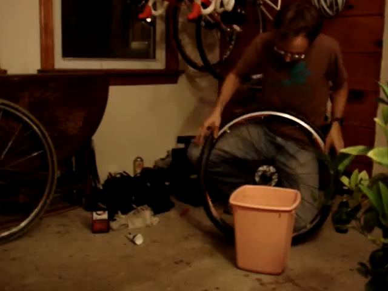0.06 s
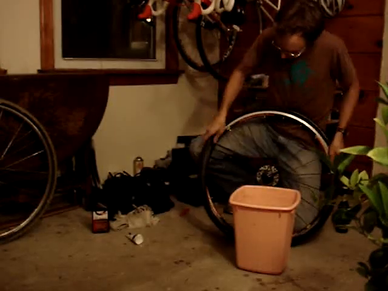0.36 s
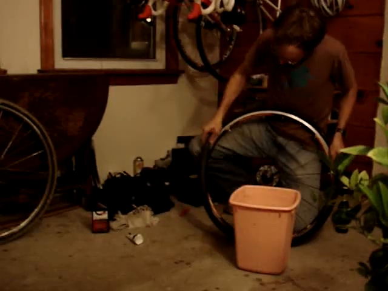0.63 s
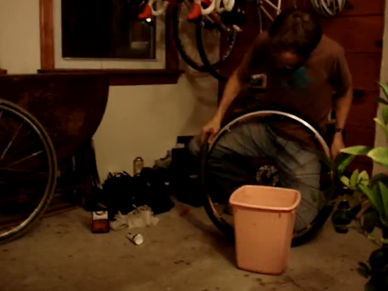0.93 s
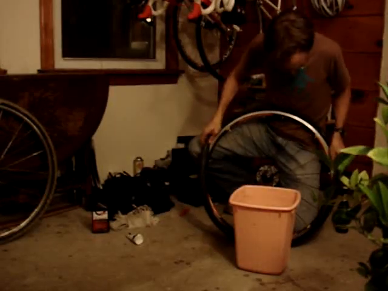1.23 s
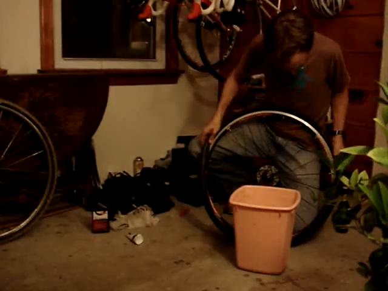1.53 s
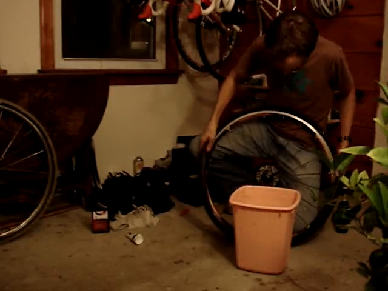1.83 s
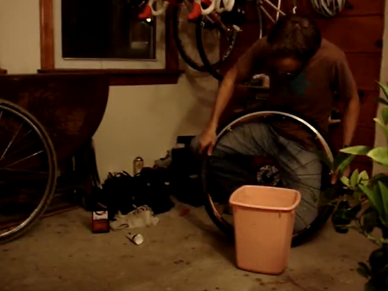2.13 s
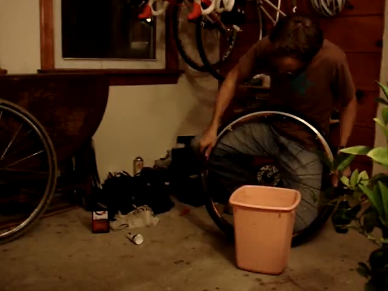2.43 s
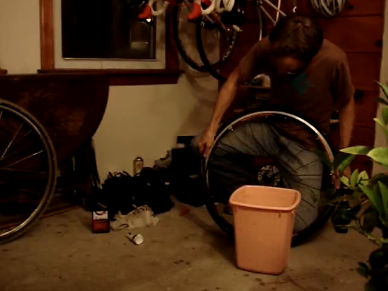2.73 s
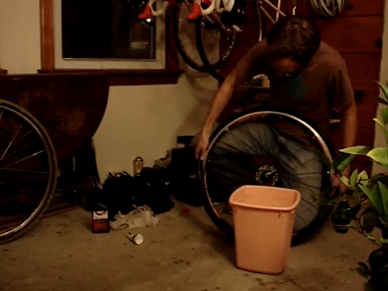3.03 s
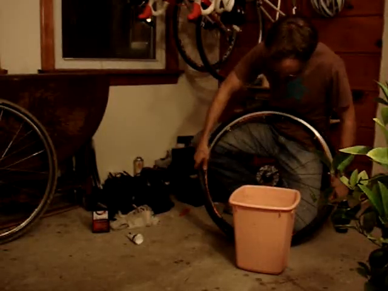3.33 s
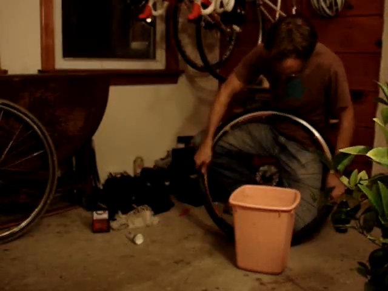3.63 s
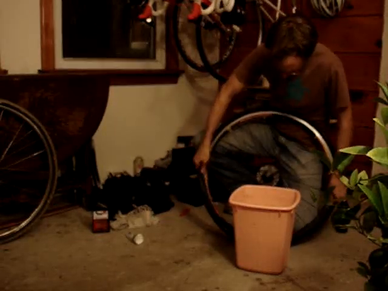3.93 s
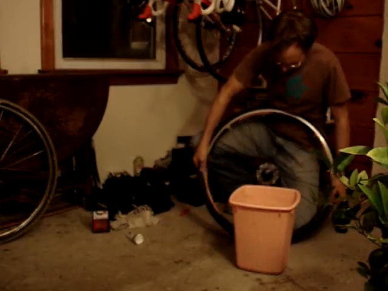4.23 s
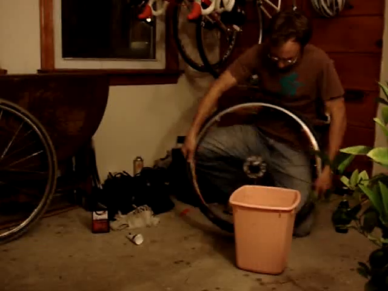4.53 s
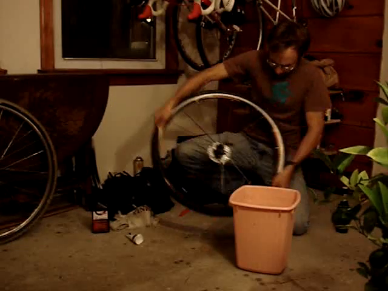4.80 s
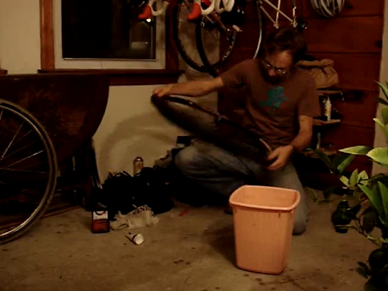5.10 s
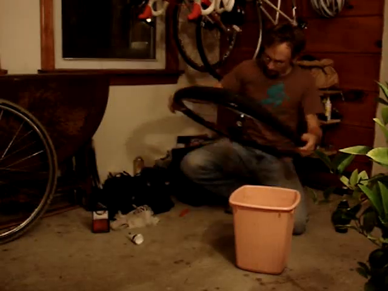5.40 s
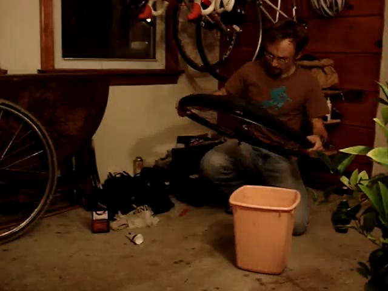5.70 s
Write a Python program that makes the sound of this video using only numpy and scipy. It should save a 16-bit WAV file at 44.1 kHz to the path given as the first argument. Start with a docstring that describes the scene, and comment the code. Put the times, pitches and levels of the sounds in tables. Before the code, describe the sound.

Three sharp snaps of a bike tire slipping over its rim set the spokes ringing, amid faint hand rubs, light knocks and hiss.

```python
"""Three loud, ringing snaps: a bicycle tyre is worked by hand over its rim in a small, hard-walled room.
Each time, the tyre's stiff edge (the bead) slips over the metal rim and sets the spokes ringing.
After the first snap it scrapes along the metal. Palms rub the tread; at the end the wheel is lifted
and the rim ticks. A tiny motor chirrs faintly close by, over a steady hiss and a thin whine."""
import sys
import numpy as np
from scipy import signal
from scipy.fft import rfft, irfft
from scipy.io import wavfile
from scipy.ndimage import uniform_filter1d

SR = 44100
rng = np.random.default_rng(int(sys.argv[2]) if len(sys.argv) > 2 else 0)


def wav_out(sig):
    """Save sig, one row per channel (or a flat mono array), as 16-bit PCM at SR to the path in sys.argv[1]."""
    wavfile.write(sys.argv[1], SR, np.round(np.clip(np.atleast_2d(sig).T, -1, 1) * 32767).astype(np.int16))


N = 262747
TIME = np.arange(N) / SR


def bead_snaps(casing_db=6.5, casing_octaves=0.079, spokes_db=-6, rebound_s=0.0085):
    """The bead jumps the rim in quick slips; the tyre's wall (the casing) and the spokes ring."""
    # slips of the bead: t/s, level/dB, treble tilt/(dB per octave), casing ring f/Hz
    slips = [(1.5034, -6, 0, 880), (1.5344, -12, -2.5, 1850), (1.5585, -18, -5.5, 633),
             (2.6664, -10, 1, 2200), (2.6687, -9.5, -5, 1066), (3.948, -29, -3, 558), (3.967, -16, 3, 2480),
             (3.9745, -13.5, -5, 625), (3.9837, -22, -2, 878), (4.069, -19, 1, 463), (4.109, -26, -1, 760),
             (4.157, -33.5, 11, 910), (4.205, -36, 9, 840)]
    # tone of each stretch of the bead: t/s when it is worked, list of (f/Hz, level/dB)
    stretches = [(1.5, [(40, -27), (150, -28), (300, -9), (570, 0.5), (770, -3), (900, -1), (1030, -6.5),
                 (1190, -0.5), (1850, -6.5), (2250, -10.5), (3100, -17.5), (6200, -35.5), (7200, -35),
                 (10000, -47)]), (2.67, [(50, -42), (110, -32), (300, -18.5), (460, -14), (600, -9),
                 (780, -15), (1040, 0), (1400, -10), (2200, -15.5), (2600, -17.5), (3400, -18.5),
                 (4200, -25.5), (6600, -31), (10000, -50.5)]), (4.0, [(60, -31), (120, -28.5), (250, -14.5),
                 (400, -8), (580, -0.5), (680, -4.5), (870, 1.5), (1160, -7), (1400, -15.5), (2400, -20.5),
                 (4200, -34.5), (4900, -32), (7000, -47), (10000, -53)])]
    # notes of the spokes: f/Hz, relative level/dB, time to fade by 60 dB/s
    spoke_notes = [(400, -7, .55), (457, 11.5, 0.44), (624, 11.5, 0.34), (692, -16, 0.33), (846, -14, 0.8),
                   (835, -7.5, 0.19), (960, -23, .6), (1080, -11, .6), (1136, 19, 0.32), (1220, -17, 0.26),
                   (1780, -27, .5), (1780, -7, 0.35), (1820, -2, 0.35)]
    octaves = lambda hz: np.log2(1 + hz / 1000)
    out = np.zeros(N)
    for s, db, tilt, ring_hz in slips:
        tone = min(stretches, key=lambda row: abs(row[0] - s))[1]
        casing = lambda hz: casing_db / (1 + (np.log2(hz / ring_hz) / casing_octaves) ** 2)
        snap = -amp(db) * click(lambda hz: value_at(tone, hz) + tilt * octaves(hz) + casing(hz))
        # the bead bounces back once, weaker and duller
        rebound = -amp(db - 11) * click(lambda hz: value_at(tone, hz) + (tilt - 3) * octaves(hz))
        add(out, s, workshop(snap, wet_db=4))
        add(out, s, amp(spokes_db) * ring(snap, spoke_notes))
        add(out, s + rebound_s, workshop(rebound, wet_db=4))
    return out


def wheel_thud(s=1.5035, push_db=-12.5, push_s=0.0011, boom_db=-12, boom_fade_s=0.45):
    """The first snap jolts the whole wheel: one short, low push that booms briefly in the room."""
    out, t = np.zeros(N), TIME[:SR // 2]
    push = amp(push_db) * t / push_s * np.exp(-t / push_s)
    boom = rng.standard_normal(len(t)) * amp(-60 * t / boom_fade_s)
    add(out, s, push)
    add(out, s, amp(boom_db) * signal.fftconvolve(push, boom / np.linalg.norm(boom)))
    return out


def bead_scrapes(gain_db=-6, squeal_db=-7):
    """The freed bead rasps along the rim in jerks, squeaking at first; the casing squeals hoarsely."""
    # jerks: peak t/s, length/s, relative level/dB, squeak compared with rasp/dB
    jerks = [(1.699, .07, -44.5, 0), (1.745, 0.1, -49, -0.5), (1.795, 0.02, -38, -13),
             (1.817, 0.083, -30.5, -10.5), (1.933, 0.22, -39.5, -15), (2.082, .1, -45.5, -20)]
    # tone of the rasp: f/Hz, level/dB
    rasp_tone = [(100, -35), (300, -18.5), (600, -11.5), (760, -18.5), (900, -6.5), (1250, -4.5),
                 (1530, -4), (1800, -9.5), (2550, -16.5), (3000, -15.5), (4700, -19), (6000, -26),
                 (10000, -41)]
    # squeal of the casing: f/Hz, width/Hz, level/dB
    squeal_peaks = [(1270, 44, 4), (1540, 61, -0.5)]
    # thin squeak of rubber on bare metal: f/Hz, width/Hz, level/dB
    squeak_peaks = [(4360, 920, 0)]
    rasp = coloured(crackle(per_s=2100, spread_db=2), rasp_tone)
    squeal = unit(resonate(crackle(per_s=3500, spread_db=-3), squeal_peaks)[:N])
    squeak = unit(resonate(crackle(per_s=3500, spread_db=-3), squeak_peaks)[:N])
    dry = np.zeros(N)
    for s, length, db, squeak_db in jerks:
        level = amp(db + swell_db(s, length, rise_share=0.46, depth_db=20.5, roundness=2.05))
        dry += level * (rasp + amp(squeal_db) * squeal + amp(squeak_db) * squeak)
    return amp(gain_db) * workshop(dry, wet_db=3)[:N]


def wheel_knocks(scuff_s=0.0023, lift_s=4.7, lifted_db=12.5):
    """Hands and tyre knock the wheel; harder knocks span more pitches and ring the rim more."""
    # light knocks: t/s, level/dB, centre f/Hz, width/octaves
    knocks = [(0.020, -34.5, 850, 1.06), (0.065, -39.5, 795, 1.8), (0.372, -33.5, 800, 0.27),
              (0.761, -36.5, 890, 1.15), (0.772, -31, 690, 0.5), (1.049, -40.5, 1070, 1.2),
              (2.510, -28.5, 1690, 0.77), (2.515, -40.5, 337, 0.57), (2.85, -36, 1025, 0.25),
              (4.38, -40, 617, 0.68), (4.59, -40.5, 330, 0.68), (5.215, -33.5, 2170, 0.78),
              (5.37, -37.5, 582, 0.11), (5.396, -35.5, 784, 0.42), (5.463, -28.5, 2650, 1.01)]
    # notes of the rim: f/Hz, width/Hz, level/dB
    rim_peaks = [(615, 34, 17), (1150, 140, 4.5), (1970, 35, -14), (2230, 72, 0.5), (2880, 120, -1),
                 (3220, 64, -10), (4270, 200, -9.5), (6600, 160, 0)]
    out, t = np.zeros(N), TIME[:SR // 40]
    for s, db, centre_hz, octaves in knocks:
        scuff = rng.standard_normal(len(t)) * np.exp(-t / scuff_s)
        tone_db = lambda hz: -9 * np.log(1 + (np.log2(hz / centre_hz) / octaves) ** 2)
        blow = signal.fftconvolve(scuff, click(tone_db))
        blow *= amp(db) * np.sqrt(SR / 1000) / np.linalg.norm(blow)
        rim_gain = amp(-19 + 8.5 * octaves + lifted_db * (s > lift_s))  # a lifted rim rings more freely
        sound = rim_gain * resonate(blow, rim_peaks)
        add(sound, 0, blow)
        add(out, s, workshop(sound / np.hypot(1, rim_gain), wet_db=4))
    return out


def palm_rubs(gain_db=-9, hollow_db=-2, depth_db=18, drop_hz_per_db=9):
    """Palms stick and slip over the tread; the tyre's hollow ring drops in pitch as the grip eases."""
    # strokes of the palms: firmest push t/s, length/s, relative level/dB, hollow ring f/Hz
    strokes = [(0.108, 0.96, -50.5, 680), (0.35, 0.16, -47, 780), (1.06, 0.33, -54.5, 1000),
               (3.054, 0.56, -40, 1200), (4.357, 1.15, -54, 910), (4.961, .13, -48.5, 880),
               (5.32, 0.35, -50.5, 2370), (5.539, 0.61, -52, 1170), (5.955, 0.18, -34, 3570)]
    # tone of the rubbed tread: f/Hz, level/dB
    tread_tone = [(100, -26.5), (300, -9.5), (600, -2), (760, -4), (1100, -4), (1500, -1), (1900, -6),
                  (2800, -11.5), (3800, -10.5), (6000, -14.5), (10000, -22)]
    level, weighted_hz = np.zeros(N), np.zeros(N)
    for s, length, db, ring_hz in strokes:
        grip_db = swell_db(s, length, rise_share=0.4, depth_db=depth_db, roundness=1.3)
        push = amp(db + grip_db)
        level += push
        weighted_hz += push * (ring_hz + drop_hz_per_db * np.maximum(grip_db, -depth_db))
    tread = coloured(crackle(per_s=3300, spread_db=1), tread_tone)
    hollow = gliding_ring(tread, weighted_hz / level, width_hz=770)  # the firmest stroke leads the pitch
    dry = level * (tread + amp(hollow_db) * hollow)
    return amp(gain_db) * workshop(dry, wet_db=5)[:N]


def motor_chirrs(gain_db=-4, twitches_per_s=2.2, twitch_s=0.068, twitch_db=-56.5):
    """A tiny motor's rapid ticks ring a low and a high note, too close by to carry any echo."""
    # chirrs: t/s, length/s, relative level/dB of the low note and of the high note
    chirrs = [(0, 0.3, -49.5, -55), (0.328, 0.033, -51, -48), (0.71, 0.042, -51, -60),
              (1.195, 0.23, -56, -60), (3.454, .046, -63, -55), (3.524, 0.2, -51.5, -57.5),
              (4.248, .33, -51.5, -55), (4.69, .11, -48.5, -52.5), (4.937, 0.44, -53, -55.5),
              (5.25, 0.45, -61, -56)]
    # one list for each note: f/Hz, width/Hz, level/dB
    notes = [
        [(1620, 73, 0)],
        [(2780, 260, -1.5), (3640, 170, 2.5)],
    ]
    low, high = (unit(resonate(crackle(per_s=700, spread_db=3.5), peaks))[:N] for peaks in notes)
    twitch_times = TIME[rng.random(N) < twitches_per_s / SR]
    twitches = [(s, twitch_s, twitch_db, twitch_db) for s in twitch_times]
    out = np.zeros(N)
    for s, length, low_db, high_db in chirrs + twitches:
        both_notes = amp(low_db) * low + amp(high_db) * high
        run = both_notes[round(s * SR):][:round(length * SR)]
        add(out, s, run * signal.windows.tukey(len(run), 0.4))
    return amp(gain_db) * out


def motor_steps(steps_per_s=60):
    """The same motor moves in even steps, each a tiny, high tick."""
    # runs of steps: t/s, length/s, level/dB
    runs = [(.005, .14, -46), (0.784, .19, -51), (1.169, .08, -46)]
    # notes of one tick: f/Hz, width/Hz, level/dB
    tick_peaks = [(3700, 300, 2), (8900, 550, -1)]
    tick = resonate(np.array([np.sqrt(SR / 1000)]), tick_peaks)
    out = np.zeros(N)
    for start, length, db in runs:
        for s in np.arange(start, start + length, 1 / steps_per_s):
            add(out, s, amp(db) * tick)
    return out


def background(hiss_db=-50.5, waver_hz=14):
    """The room's steady hiss, with a thin, wavering whine."""
    # tone of the hiss: f/Hz, relative level/dB
    hiss_tone = [(25, -20), (65, -5), (120, -5), (230, 0.5), (450, 0.5), (800, -1), (980, 1.5), (1200, -3),
                 (1650, -2.5), (2400, -5.5), (4000, -9), (7000, -11.5), (9900, -13.5)]
    # notes of the whine: f/Hz, level/dB
    whine_notes = [(8000, -70.5), (8032, -72)]
    whine = np.zeros(N)
    for hz, db in whine_notes:
        waver = waver_hz * unit(uniform_filter1d(rng.standard_normal(N), size=900))
        whine += amp(db) * unit(np.sin(2 * np.pi * np.cumsum(hz + waver) / SR))
    return amp(hiss_db) * coloured(rng.standard_normal(N), hiss_tone) + whine


def workshop(x, wet_db, build_s=0.0014, bass_cut_hz=170):
    """Hard walls add a few clear echoes, then a wash of tiny random ones whose gain is wet_db."""
    # how long the room rings: f/Hz, time to fade by 60 dB/s
    fade_times = [(100, 0.32), (300, 0.36), (700, 0.48), (1200, 0.48), (2500, 0.46), (5000, 0.41),
                  (10000, 0.6)]
    # first echoes from floor and walls: t/s, gain
    echoes = [(.0018, -0.56), (.0031, .28), (.0072, 0.42), (.0098, -0.37), (0.0153, 0.28), (0.0235, 0.039)]
    taps = rng.choice([-1., 1.], SR) * (rng.random(SR) < 4000 / SR)
    hz, t, bands = signal.stft(taps, SR, nperseg=256)
    fade = amp(-60 * t / value_at(fade_times, hz)[:, None])
    tail = signal.istft(bands * fade, SR, nperseg=256)[1][:SR]
    spectrum = rfft(tail * (1 - np.exp(-TIME[:SR] / build_s)))
    spectrum /= np.sqrt(uniform_filter1d(abs(spectrum) ** 2, size=120))  # no band stands out
    bass_cut = signal.butter(2, bass_cut_hz, "high", fs=SR, output="sos")
    tail = signal.sosfilt(bass_cut, irfft(spectrum, SR))
    response = amp(wet_db) * tail[:SR * 3 // 4]
    for s, gain in [(0.0016, 1)] + echoes:  # the direct sound comes first
        add(response, s, np.array([gain]))
    return signal.fftconvolve(x, response)


def amp(db):
    """Turns decibels into a gain."""
    return 10 ** (np.asarray(db) / 20)


def unit(x):
    """Scales x to an average power of 1."""
    return x / np.sqrt(np.mean(x ** 2) + 1e-20)


def value_at(points, hz):
    """Reads a curve of (f/Hz, value) points along a pitch scale."""
    f, value = np.transpose(points)
    return np.interp(np.log(hz + 1), np.log(f + 1), value)


def add(mix, s, sound):
    """Mixes a sound in, starting at s seconds."""
    part = mix[max(round(s * SR), 0):][:len(sound)]
    part += sound[:len(part)]


def coloured(x, tone):
    """Shapes x with a tone curve (f/Hz, level/dB), at an average power of 1."""
    gain = amp(value_at(tone, np.fft.rfftfreq(len(x), 1 / SR)))
    return unit(irfft(rfft(x) * gain, len(x)))


def click(tone_db, size=4096):
    """A click with the tone tone_db(hz) and the energy of 1 ms at full level."""
    hz = abs(np.fft.fftfreq(size, 1 / SR)) + 1
    log_gain = np.log(amp(np.maximum(tone_db(hz), -90)))
    spectrum = np.exp(np.conj(signal.hilbert(log_gain)))  # packs the energy at the start
    pulse = np.fft.ifft(spectrum).real
    return pulse * np.sqrt(SR / 1000 / np.sum(pulse ** 2))


def crackle(per_s, spread_db):
    """Tiny ticks of uneven size at random moments, as when a surface sticks and slips."""
    sizes = amp(spread_db * np.minimum(rng.exponential(1, N), 4)) * rng.choice([-1, 1], N)
    return unit(sizes * (rng.random(N) < per_s / SR))


def swell_db(peak_s, length, rise_share, depth_db, roundness):
    """Level of one push: it swells to 0 dB at peak_s and is depth_db lower at both ends."""
    before = (peak_s - TIME) / rise_share
    after = (TIME - peak_s) / (1 - rise_share)
    distance = np.maximum(before, after) / length
    return np.maximum(-depth_db * distance ** roundness, -120)


def ring(x, notes):
    """Sets fading notes (f/Hz, level/dB, fade/s) ringing with x, keeping the energy of x."""
    t = np.arange(SR // 2) / SR
    body = sum(amp(db - 60 * t / fade_s) * np.sin(2 * np.pi * hz * t) for hz, db, fade_s in notes)
    out = signal.fftconvolve(x, body)
    return out * np.linalg.norm(x) / np.linalg.norm(out)


def resonate(x, peaks):
    """Rings short notes (f/Hz, width/Hz, level/dB) with x; wider ones fade faster."""
    notes = [(hz, db + 20 * np.log10(width), np.log(1000) / np.pi / width) for hz, width, db in peaks]
    return ring(x, notes)


def gliding_ring(x, hz, width_hz):
    """Rings one note with x while its pitch follows the curve hz."""
    turn = np.exp(2j * np.pi * np.cumsum(hz) / SR)
    decay = np.exp(-np.pi * width_hz / SR)
    return unit((turn * signal.lfilter([1 - decay], [1, -decay], x / turn)).real)


def scene():
    """The wheel, the motor and the background, heard from one spot."""
    wheel = bead_snaps() + wheel_thud() + bead_scrapes() + wheel_knocks() + palm_rubs()
    return (wheel + motor_chirrs() + motor_steps() + background())[None]


def record(dry):
    """The microphone rounds off the highest peaks; then the top treble is cut."""
    ceiling, cutoff_hz = 0.78, 10080
    rounded = dry / (1 + (dry / ceiling) ** 4) ** 0.25
    lowpass = signal.firwin(511, cutoff_hz, window=("kaiser", 8), fs=SR)
    return signal.oaconvolve(rounded, lowpass[None], "same")


dry = scene()
out = record(dry)
wav_out(out)
```